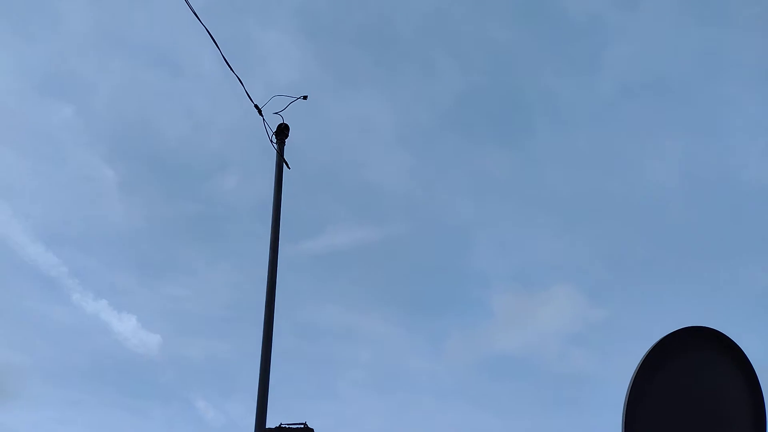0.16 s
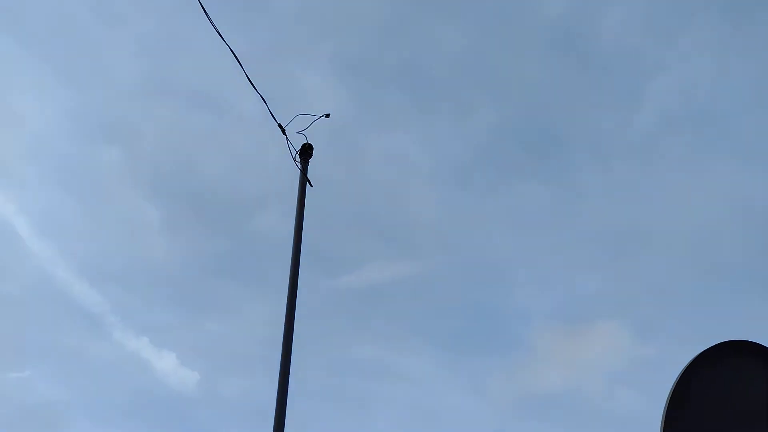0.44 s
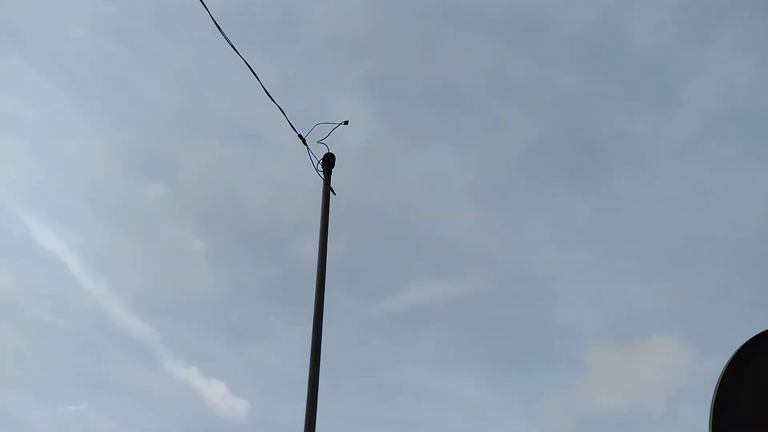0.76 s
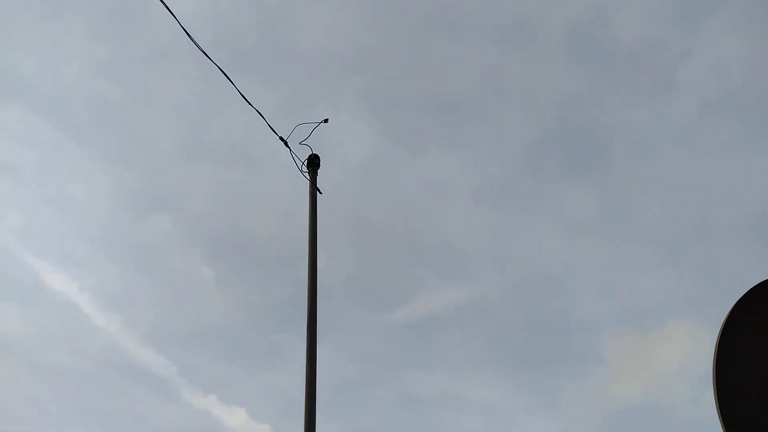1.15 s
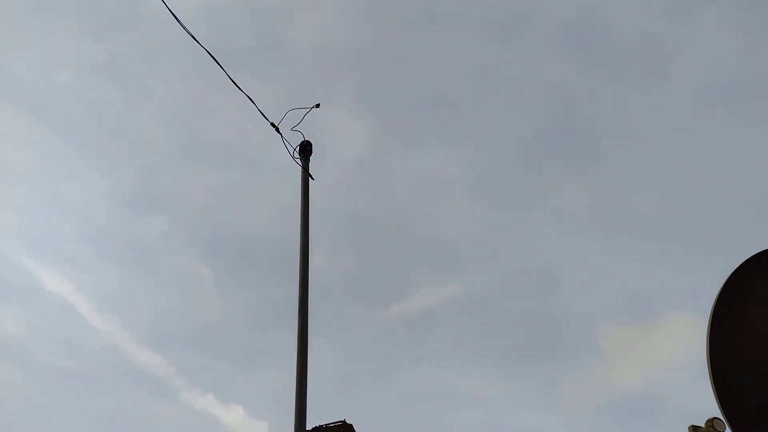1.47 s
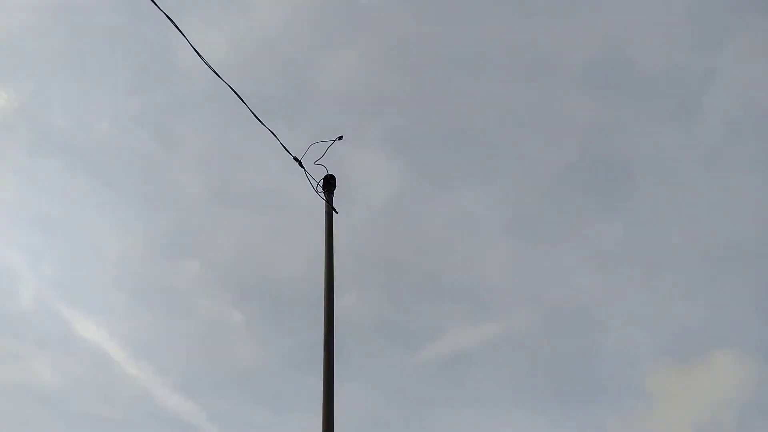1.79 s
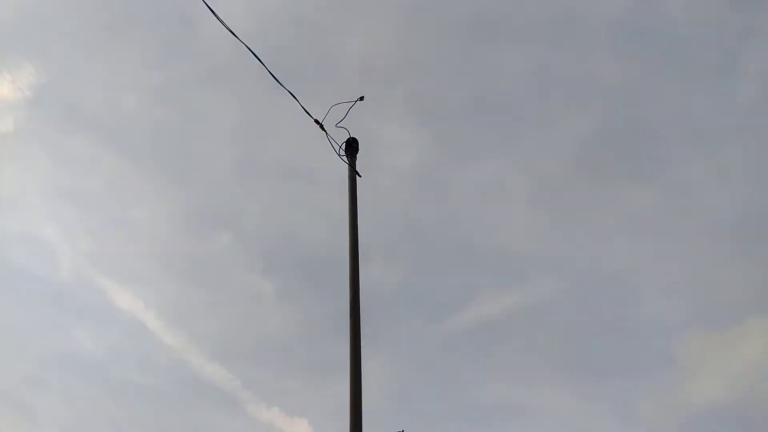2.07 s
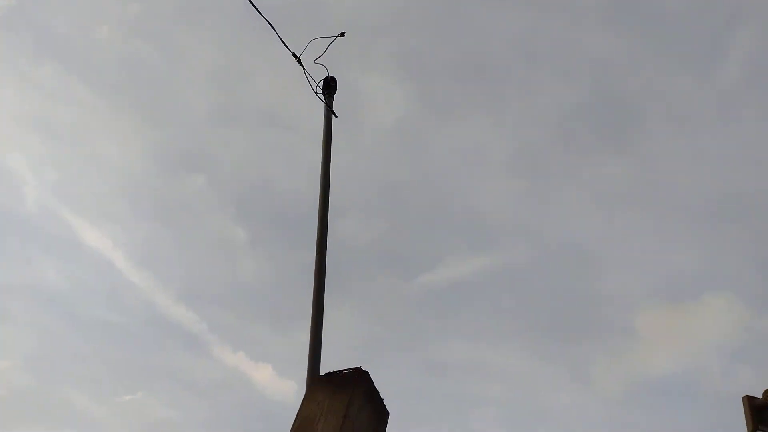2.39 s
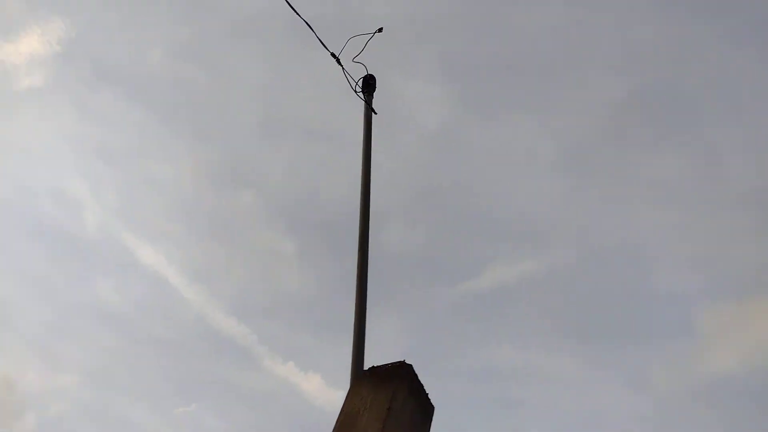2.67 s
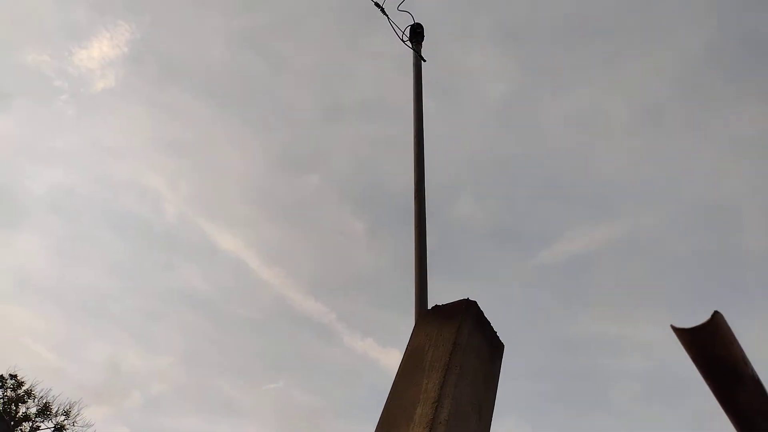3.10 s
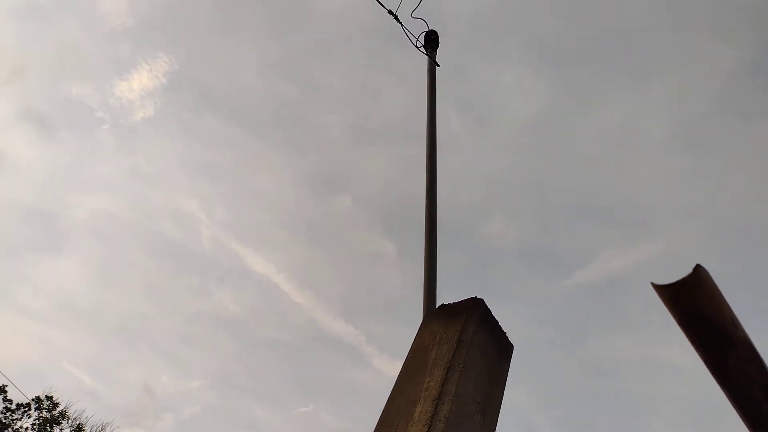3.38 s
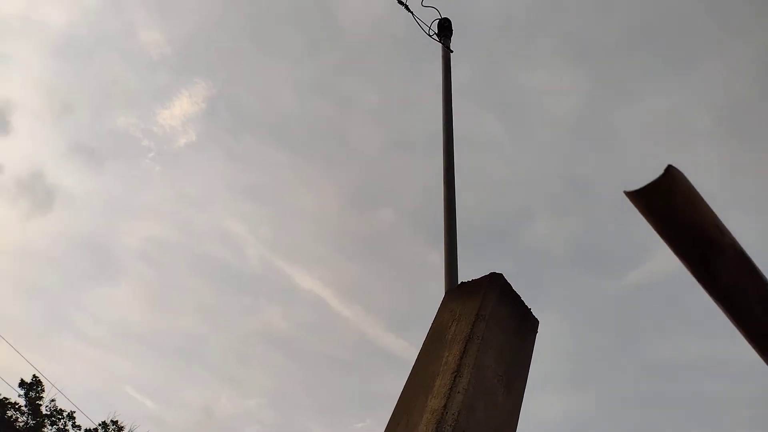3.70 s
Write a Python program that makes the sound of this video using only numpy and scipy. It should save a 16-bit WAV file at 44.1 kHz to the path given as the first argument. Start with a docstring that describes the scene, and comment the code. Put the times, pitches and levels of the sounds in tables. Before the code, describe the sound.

Harsh fowl-like birds call in an open yard: a nearer low bird rattles in short rhythmic bursts, a farther, higher one squawks hoarsely between them, with light echoes, a steady outdoor hush and small dry scuffs near the microphone.

```python
"""Chachalacas call in a harsh rhythmic chorus across an open yard.
The nearer, lower bird pulses its long windpipe into a rasping rattle, now and then catching a clean note.
A higher bird farther off answers with hoarse squawks: wavering harmonics blurred by noise.
Gliding tones make distant hoots and small chirps; noise bursts make dry scuffs near the microphone.
Scattered echoes from trees and walls throw the calls back over shaped noise, a steady outdoor hush."""
import sys
import numpy as np
from scipy import signal
from scipy.fft import rfft, irfft
from scipy.io import wavfile

SR = 44100
rng = np.random.default_rng(int(sys.argv[2]) if len(sys.argv) > 2 else 0)


def wrap_up_sound(samples):
    """Save the sound to the file named by the first command line argument, as 16-bit audio."""
    columns = np.atleast_2d(samples).T
    # keep every value between -1 and 1, then stretch to whole-number steps
    tamed = np.clip(columns, -1, 1)
    steps = np.round(tamed * 32767).astype(np.int16)
    wavfile.write(sys.argv[1], SR, steps)


N = 169785  # samples


def amp(db):
    """Turns decibels into gain."""
    return 10 ** (np.asarray(db) / 20)


def unit(x):
    """Scales to rms 1."""
    return x / np.sqrt(np.mean(x ** 2) + 1e-20)


def read(points, hz):
    """Reads a table on a log-frequency axis."""
    f, value = np.transpose(points)
    return np.interp(np.log(hz + 1), np.log(f + 1), value)


def follow(points, t):
    """Reads a table along time, in seconds."""
    return np.interp(t, *np.transpose(points))


def add(mix, start, sound):
    """Mixes a sound in at a time in seconds, cut at the end of the scene."""
    part = mix[max(round(start * SR), 0):][:len(sound)]
    part += sound[:len(part)]


def colour(x, points):
    """Filters a sound through a spectrum table, then scales it to rms 1."""
    gain = amp(read(points, np.fft.rfftfreq(len(x), 1 / SR)))
    return unit(irfft(rfft(x) * gain, len(x)))


def noise():
    """A third of a second of white noise, longer than any call."""
    return rng.standard_normal(SR // 3)


def drift(white, hz):
    """Smooth random motion up to about a rate, at rms 1."""
    smoothing = np.exp(-(np.fft.rfftfreq(len(white), 1 / SR) / hz) ** 2)
    return unit(irfft(rfft(white) * smoothing, len(white)))


def resonate(x, hz, width):
    """A resonance that can move: shift its pitch down to zero, smooth, shift back."""
    turn = np.exp(2j * np.pi * np.cumsum(hz * np.ones(len(x))) / SR)
    r = np.exp(-np.pi * width / SR)
    smooth = signal.lfilter([1 - r], [1, -r], x / turn + 1e-18)
    return 2 * (turn * smooth).real


def rings(pulses, hz, table):
    """Steep resonances that move together with one pitch curve."""
    total = 0
    for multiple, width, db in table:
        ring = resonate(pulses, multiple * hz, width)
        total = total + amp(db) * unit(resonate(ring, multiple * hz, 3 * width))
    return total


def gate(t, rise, fall):
    """Attack, hold and release, with rise and fall in seconds."""
    attack = np.sin(np.pi / 2 * np.minimum(t / rise, 1))
    release = np.sin(np.pi / 2 * np.minimum((t[-1] - t) / fall, 1))
    return attack * release


# spectrum of the open-air hush: (freq_hz, relative_db)
HUSH_SPECTRUM = [(20, -38), (85, -1), (180, 2.5), (800, -3), (1200, -7), (2000, -20), (7000, -14),
                 (11000, -13.5), (13000, -24), (16000, -36)]
HUSH_DB, HUSH_PATCH_DB = -52, 0.5  # middle level, rms drift
# spectrum of the birds far away: (freq_hz, relative_db)
CHORUS_SPECTRUM = [(700, -18), (1200, 0.5), (1900, -8.5), (3700, -10), (6000, -17), (10500, -18),
                   (14000, -38.5)]
# middle level of those far birds: (time_s, level_db)
CHORUS_LEVEL = [(0, -71), (.3, -58.5), (.65, -47.5), (3.3, -49.5), (3.85, -51.5)]


def background():
    """Steady outdoor hush and the blur of birds far away, both shaped noise of drifting level."""
    hush_db = HUSH_DB + HUSH_PATCH_DB * drift(rng.standard_normal(N), 10)
    hush = amp(hush_db) * colour(rng.standard_normal(N), HUSH_SPECTRUM)
    chorus_db = follow(CHORUS_LEVEL, np.arange(N) / SR) + 0.36 * drift(rng.standard_normal(N), 6.2)
    return hush + amp(chorus_db) * colour(rng.standard_normal(N), CHORUS_SPECTRUM)


# how long the yard's echoes take to fall 60 dB: (freq_hz, decay_s)
YARD_DECAY = [(200, 0.31), (1200, 0.45), (4000, 0.55), (12000, 0.47)]


def yard(x):
    """Sparse random echoes from trees and walls, each band dying at its own pace."""
    taps = rng.standard_normal(SR) * (rng.random(SR) < 1500 / SR)  # about 1500 echoes per second
    taps = taps * (np.arange(SR) > .006 * SR)
    hz, t, z = signal.stft(taps, SR, nperseg=256)
    decay = amp(-60 * t / read(YARD_DECAY, hz)[:, None])
    tail = signal.istft(z * decay, SR, nperseg=256)[1]
    return signal.fftconvolve(x, tail / np.linalg.norm(tail))[:N]


# distant hoots: (start_s, length_s, opening_hz, closing_hz, level_db); arch and waver also move the pitch
HOOTS = [(1.749, 0.19, 889, 859, -49.5), (3.555, 0.11, 841, 887, -49.5), (3.672, 0.086, 877, 817, -48.5)]
# a small bird's falling chirps: (start_s, length_s, opening_hz, closing_hz, level_db)
CHIRPS = [(.228, 0.039, 3720, 3160, -52.5), (.803, 0.033, 3640, 3130, -50)]
WHISTLE_ARCH, WHISTLE_WAVER = 0.0193, 0.0071  # shares of the pitch
WHISTLE_RISE, WHISTLE_FALL = 0.088, 0.28  # shares of the length


def whistle(length, hz, end_hz, db):
    """A soft, far sine tone that glides in an arch and fades."""
    t = np.arange(0, length, 1 / SR)
    arch = np.sin(np.pi * t / length)
    bend = 1 + WHISTLE_ARCH * arch + WHISTLE_WAVER * drift(noise(), 60)[:len(t)]
    glide = (hz + (end_hz - hz) * t / length) * bend
    tone = unit(np.sin(2 * np.pi * np.cumsum(glide) / SR))
    return amp(db) * tone * gate(t, WHISTLE_RISE * length, WHISTLE_FALL * length)


# small dry scuffs near the microphone: (start_s, decay_s, onset_level_db)
SCUFFS = [(.893, 0.0081, -34), (0.914, 0.0082, -35), (1.408, 0.028, -41), (1.789, 0.054, -43),
          (2.501, 0.013, -35)]
# spectrum of the scrape: (freq_hz, relative_db)
SCUFF_SPECTRUM = [(1500, -39), (3500, 4.5), (7000, -1), (11000, 6.5), (13500, -13), (16000, -17)]


def scuff(decay, db):
    """A short bright scrape: shaped noise that dies away exponentially."""
    hiss = colour(noise(), SCUFF_SPECTRUM)
    return amp(db) * hiss * np.exp(-np.arange(len(hiss)) / SR / decay)


# far, high bird: (start_s, length_s, opening_hz, turning_hz, closing_hz, level_db, overtone_db, hoarseness_0_to_1)
SQUAWKS = [(.601, 0.18, 1393, 2003, 1967, -48.5, -47, 0.54),
           (0.783, 0.052, 1115, 1285, 1350, -48, -55, 0.53),
           (0.833, 0.095, 1800, 1955, 2000, -51, -44.5, 0.05),
           (.923, 0.15, 696, 1427, 1697, -41.5, -47.5, 0.42),
           (1.691, 0.16, 848.5, 1759, 2160, -41, -40.5, 0.59),
           (1.898, 0.088, 900, 1607, 1880, -39, -42.5, 0.7), (1.95, 0.22, 1580, 1476, 1337, -39, -43, .55),
           (2.031, 0.054, 1732, 1840, 1890, -42.5, -41, 0.1),
           (2.401, 0.063, 1340, 1531, 1380, -38.5, -37.5, 0.14),
           (2.638, .165, 1096, 1900, 2050, -43.5, -43, 0.52), (2.676, .045, 768, 1018, 1290, -48.5, -45, 0),
           (2.714, 0.051, 1390, 1686, 1810, -38, -36.5, 0.42),
           (2.863, .065, 752, 1464, 1606, -40, -46.5, 0.4),
           (2.895, 0.081, 1698, 2020, 1996, -41, -38.5, 0.28),
           (2.981, 0.15, 1297, 1661, 1255, -36, -39.5, 0.65)]
TURN_AT, SQUAWK_RISE, SQUAWK_FALL = .52, 0.48, 0.26  # shares of the length
WOBBLE, WOBBLE_HZ = .025, 195  # rms share of the pitch, rate
FLUTTER_DB, FLUTTER_HZ = 3.5, 130
HOARSE_WIDTH_HZ, AIR = 670, 0.42  # AIR: breath noise present even without hoarseness
# its overtones: (multiple_of_half_the_pitch, relative_db)
PARTIALS = [(3, -14), (4, 2.5), (5, -2.5), (6, -6.5), (7, -4.5), (8, -10)]
UNDERTONE_DB = -15  # a tone at three quarters of the pitch
# spectrum of harsh breath, in the squawks and the near bird's rattle: (freq_hz, relative_db)
RASP_SPECTRUM = [(900, -51), (1700, -23), (2200, 4), (3000, 0), (4000, -3.5), (5800, -6.5), (8500, -10.5),
                 (11000, -11.5), (13000, -36), (16000, -51)]


def squawk(length, open_hz, turn_hz, close_hz, db, overtone_db, hoarse):
    """A shaky voice curves, strongest in its second harmonic; hoarseness blurs it and the overtones flutter."""
    t = np.arange(0, length, 1 / SR)
    u = t / length
    opening = (open_hz - turn_hz) * (1 - u / TURN_AT) ** 2
    closing = (close_hz - turn_hz) * ((u - TURN_AT) / (1 - TURN_AT)) ** 2
    hz = turn_hz + np.where(u < TURN_AT, opening, closing)
    wobble = 1 + WOBBLE * drift(noise(), WOBBLE_HZ)[:len(t)]
    phase = np.pi * np.cumsum(hz * wobble) / SR  # the fundamental, half the pitch
    voice = unit(np.sin(2 * phase) + amp(UNDERTONE_DB) * np.sin(1.5 * phase))
    blur = resonate(noise()[:len(t)], hz, HOARSE_WIDTH_HZ)
    blur = unit(resonate(blur, hz, HOARSE_WIDTH_HZ))
    core = unit((1 - hoarse) * voice + hoarse * blur)
    tones = np.zeros(len(t))
    for harmonic, relative_db in PARTIALS:
        flutter = FLUTTER_DB * drift(noise(), FLUTTER_HZ)[:len(t)]
        tones += amp(relative_db + flutter) * np.sin(harmonic * phase + rng.uniform(0, 2 * np.pi))
    breath = colour(noise()[:len(t)], RASP_SPECTRUM)
    overtones = unit((1 - hoarse) * unit(tones) + (hoarse + AIR) * breath)
    shape = gate(t, SQUAWK_RISE * length, SQUAWK_FALL * length)
    return amp(db) * core * shape ** .8 + amp(overtone_db) * overtones * shape ** 1.1


# near bird's clean notes: (middle_s, length_s, opening_hz, closing_hz, peak_level_db), pitches before the bend
NOTES = [(.228, .034, 1170, 1397, -37.5), (.386, .032, 1218, 1175, -33), (.656, .022, 1251, 1185, -32),
         (.973, .024, 1442, 1312, -33), (1.024, .022, 1325, 1270, -28), (1.181, .024, 1301, 1190, -27),
         (1.237, .018, 1226, 1342, -28), (1.375, .021, 1253, 1235, -23), (1.407, .018, 1330, 1213, -27),
         (2.01, .02, 1342, 1344, -25.5), (2.137, .022, 1264, 1150, -28.5), (2.326, .022, 1185, 1296, -27.5),
         (2.357, .026, 1271, 1390, -28), (2.4, .026, 1422, 1140, -30), (3.052, .04, 1467, 1507, -32.5),
         (3.178, .024, 1347, 1315, -33)]
NOTE_BEND, NOTE_THIRD_DB = 0.025, -23  # share the pitch drops at both ends, third harmonic


def note(length, hz, end_hz, db):
    """The voice locks onto the windpipe for a moment and rings clean, bending over as it glides."""
    t = np.arange(0, length, 1 / SR)
    arch = np.sin(np.pi * t / length)
    glide = (hz + (end_hz - hz) * t / length) * (1 - NOTE_BEND * (1 - arch))
    phase = 2 * np.pi * np.cumsum(glide) / SR
    tone = np.sin(phase) + amp(NOTE_THIRD_DB) * np.sin(3 * phase)
    return amp(db) * np.sqrt(2) * arch * tone


# near, low bird: (start_s, length_s, level_db, mid_call_windpipe_hz, rasp_db, mid_call_pulses_per_s)
RATTLES = [(.135, .13, -45, 1220, -50, 185), (.32, .13, -38.5, 1202, -45.5, 124),
           (0.504, 0.053, -37.5, 1238, -41.5, 139), (.549, .16, -39, 1200, -45.5, 152),
           (.965, .11, -35.5, 1279, -43, 186), (1.138, 0.12, -33.5, 1219, -43.5, 135),
           (1.304, 0.12, -35, 1205, -45.5, 138), (1.385, 0.14, -32, 1260, -42.5, 123),
           (1.948, .12, -34, 1324, -43.5, 166), (2.114, 0.13, -32.5, 1253, -40.5, 130),
           (2.294, 0.1292, -34.5, 1238, -42, 140), (2.446, 0.061, -36, 1162, -37.5, 133),
           (3.109, 0.13, -37, 1338, -42.5, 157), (3.285, 0.13, -35, 1276, -43.5, 166),
           (3.469, 0.22, -37, 1288, -44.5, 160)]
PULSE_SPREAD_DB, PULSE_JITTER = 2.5, .09  # largest level change, spread of the gaps
PULSE_SAG = .06  # share by which the pulses slow at both ends
SHUT = 0.92  # windpipe pitch with the bill shut, as a share of the open pitch
WAVER, BILL_WAVER, WAVER_HZ = .015, .035, 45  # rms shares of the pitch, rate
RISE_S, RASP_RISE_S, FALL_S = 0.044, 0.074, .025
WINDPIPE_WIDTH_HZ = 620
RASP_PUFF_S, RASP_STEADY = 0.004, 0.65  # decay of each puff, steady breath beneath
# main windpipe resonances: (multiple_of_windpipe_pitch, width_hz, relative_db)
WINDPIPE = [(0.872, 55.6, 1), (1.001, 92, 8), (1.06, 90, -44)]
# weaker windpipe resonances: (multiple_of_windpipe_pitch, width_hz, relative_db)
SIDE_RINGS = [(0.451, 49.6, -18.5), (1.33, 171, -15)]
# high bill resonances that colour the rasp: (multiple_of_bill_pitch, width_hz, relative_db)
BILL = [(2.42, 52, -5), (2.95, 93, -9.5), (3.3, 114, -6), (4.75, 90, -14)]


def rattle(length, db, pipe_hz, rasp_db, pulse_hz):
    """Uneven pulses ring a wavering windpipe as the bill opens and shuts; each puffs rasp and rings the bill."""
    t = np.arange(0, length, 1 / SR)
    arch = np.sin(np.pi * t / length)
    gaps, sizes = rng.standard_normal(size=(2, 96))
    beats = np.cumsum(np.exp(PULSE_JITTER * gaps))
    beat_count = np.cumsum(pulse_hz * (1 - PULSE_SAG * (1 - arch))) / SR
    at = np.searchsorted(beat_count, beats - beats[0])
    inside = at < len(t)
    pulses = np.zeros(len(t))
    pulses[at[inside]] = amp(PULSE_SPREAD_DB * np.clip(sizes, -1, 1))[inside]

    hz = pipe_hz * (SHUT + (1 - SHUT) * arch + WAVER * drift(noise(), WAVER_HZ)[:len(t)])
    body = sum(amp(d) * unit(resonate(pulses, k * hz, width)) for k, width, d in WINDPIPE)
    body = resonate(body, hz, WINDPIPE_WIDTH_HZ)
    body = unit(resonate(body, hz, WINDPIPE_WIDTH_HZ))
    body += rings(pulses, hz, SIDE_RINGS)

    puffs = RASP_STEADY + signal.lfilter([1], [1, -np.exp(-1 / (RASP_PUFF_S * SR))], pulses)
    breath = colour(puffs * noise()[:len(t)], RASP_SPECTRUM)
    bill_hz = hz * (1 + BILL_WAVER * drift(noise(), WAVER_HZ)[:len(t)])
    rasp = unit(breath + rings(pulses, bill_hz, BILL))
    return amp(db) * body * gate(t, RISE_S, FALL_S), amp(rasp_db) * rasp * gate(t, RASP_RISE_S, FALL_S)


# level of the first port over the second: (freq_hz, difference_db)
PORT_BALANCE = [(100, -3.5), (700, -4), (1200, -2.6), (2000, 5), (3300, -3.5), (8000, -4), (14000, -2.5)]
# phase of the first port ahead of the second: (freq_hz, difference_rad)
PORT_PHASE = [(500, 0.23), (1200, -0.6), (4000, -0.32), (7400, -0.94), (11000, -1.6)]
# scattered sound, opposite in the two ports: (freq_hz, relative_db)
PORT_SCATTER = [(600, -24), (1200, -19.5), (4000, -21), (8000, -17.5), (14000, 5.5)]
# further lean toward the first port as time passes: (time_s, difference_db)
PORT_LEAN = [(0, 0.51), (2.2, 0.82), (3.1, 0.85), (3.85, 0.45)]


def ports(x):
    """Two microphone ports hear the scene with different level and phase; the balance shifts slowly."""
    shift = amp(follow(PORT_LEAN, np.arange(N) / SR) / 2)
    hz = np.fft.rfftfreq(N, 1 / SR)
    lean = amp(read(PORT_BALANCE, hz) / 2) * np.exp(.5j * read(PORT_PHASE, hz))
    scatter = rng.standard_normal(size=900)
    apart = amp(read(PORT_SCATTER, hz)) * rfft(scatter / np.linalg.norm(scatter), N)
    pair = np.array([lean * (1 + apart), (1 - apart) / lean])
    return irfft(rfft(x) * pair, N) * np.array([shift, 1 / shift])


NEAR_WET_DB, RASP_WET_DB, FAR_WET_DB, NOTE_WET_DB = -5, -2, -3, -7.5  # sends to the yard's echoes


def scene():
    """Both birds with their echoes, the hoots and chirps, the scuffs and the hush."""
    body, rasp, tones, far, close = np.zeros((5, N))
    for start, *row in [*HOOTS, *CHIRPS]:
        add(tones, start, whistle(*row))
    for start, *row in SCUFFS:
        add(close, start, scuff(*row))
    for start, *row in SQUAWKS:
        add(far, start, squawk(*row))
    for middle, length, *row in NOTES:
        add(tones, middle - length / 2, note(length, *row))
    for start, *row in RATTLES:
        ring, puffs = rattle(*row)
        add(body, start, ring)
        add(rasp, start, puffs)
    sent = amp(NEAR_WET_DB) * body + amp(RASP_WET_DB) * rasp
    sent += amp(FAR_WET_DB) * far + amp(NOTE_WET_DB) * tones
    return ports(body + rasp + tones + far + close + yard(sent) + background())


# spacing of the reflection's notches: (time_s, spacing_hz)
NOTCH_SPACING = [(0, 2437), (1.55, 2413), (2.78, 2456), (2.98, 2423), (3.85, 2415)]
NOTCH_NARROW = 0.14  # feedback that narrows the notches
# how deep they cut: (freq_hz, depth_0_to_1)
NOTCH_DEPTH = [(1000, 0.23), (2000, 0.89), (4900, 0.91), (9800, 0.44), (12250, 0.9), (15000, .84)]
EDGE_HZ = 15800


def record(dry):
    """Evenly spaced notches from a short reflection off ground or wall, sliding a little, then the band limit."""
    hz, t, z = signal.stft(dry, SR, nperseg=1024, noverlap=768)
    depth = np.clip(read(NOTCH_DEPTH, hz), 0, .95)[:, None]
    delay = np.exp(-2j * np.pi * hz[:, None] / follow(NOTCH_SPACING, t))
    notches = (1 - depth * delay) / (1 + depth)
    narrowing = (1 + NOTCH_NARROW) / (1 - NOTCH_NARROW * delay)
    heard = signal.istft(z * notches * narrowing, SR, nperseg=1024, noverlap=768)[1][:, :N]
    band_limit = 1 + (np.fft.rfftfreq(N, 1 / SR) / EDGE_HZ) ** 400
    return irfft(rfft(heard) / band_limit, N)


dry = scene()
out = record(dry)
wrap_up_sound(out)
```